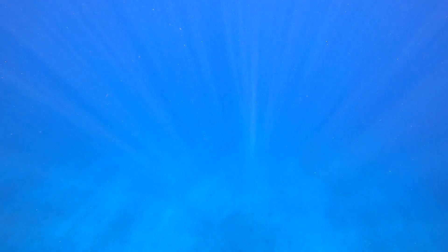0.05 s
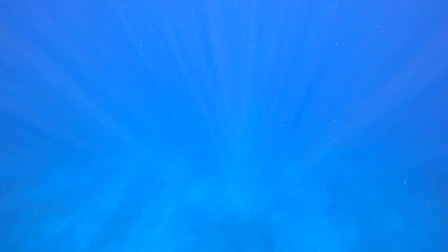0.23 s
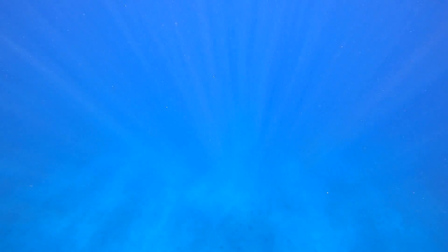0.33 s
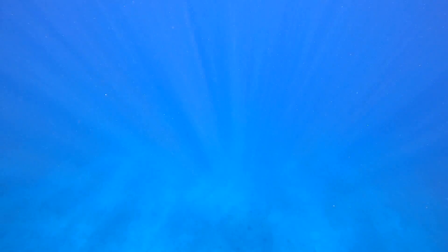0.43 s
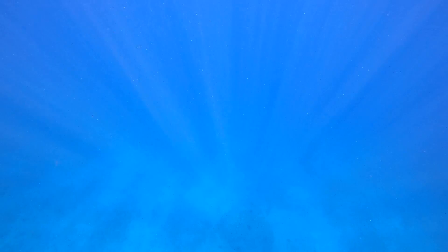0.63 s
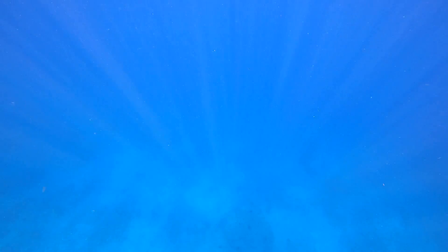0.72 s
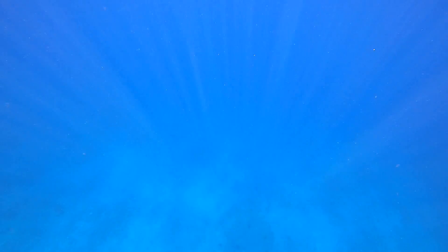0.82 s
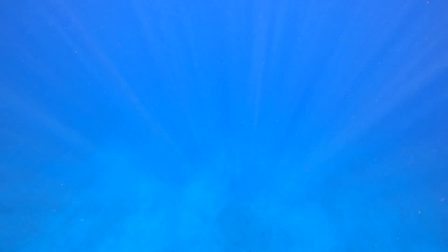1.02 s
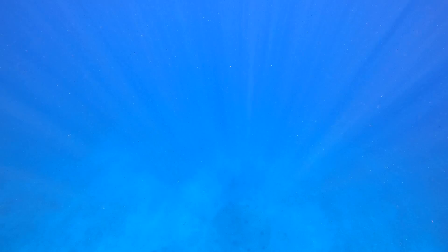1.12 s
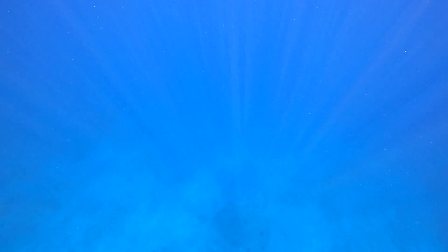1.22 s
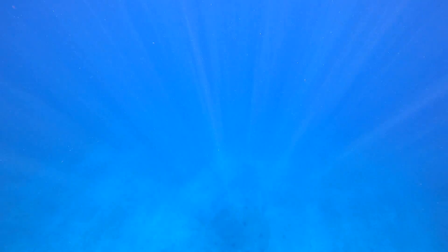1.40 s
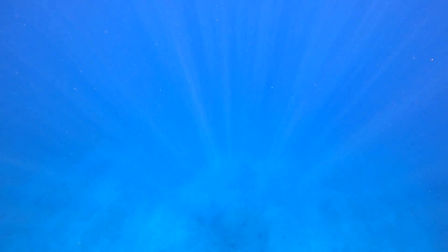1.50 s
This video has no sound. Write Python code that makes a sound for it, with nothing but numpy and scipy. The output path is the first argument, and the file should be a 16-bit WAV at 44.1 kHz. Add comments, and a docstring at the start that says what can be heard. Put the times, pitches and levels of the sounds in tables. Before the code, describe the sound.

One low underwater whale moan swells and sinks, with faint crackles and soft knocks.

```python
"""One whale moan rises and falls under water, over crackling shrimp, soft knocks and a low rumble.
The moan is an almost pure tone with faint overtones, smeared by echoes between surface and seabed;
it turns hoarse as it falls. Snapping shrimp make the crackle. Water knocks on the camera housing,
and the swell rumbles underneath."""
import sys
import numpy as np
from scipy import signal
from scipy.fft import rfft, irfft, next_fast_len
from scipy.io import wavfile
from scipy.ndimage import map_coordinates

SR = 44100
rng = np.random.default_rng(int(sys.argv[2]) if len(sys.argv) > 2 else 0)


def materialize(psi):
    """Save the field psi as 16-bit PCM at rate SR to the path in sys.argv[1].

    A 1-D psi becomes a single channel; in a 2-D psi each row is a channel.
    """
    bounded = np.clip(np.atleast_2d(psi).T, -1, 1)
    quanta = np.round(bounded * 32767).astype(np.int16)
    wavfile.write(sys.argv[1], SR, quanta)


N = 68355
T = np.arange(N) / SR

# Water noise spectra. Each row: frequency in Hz, relative level in dB.
RUMBLE_SPECTRUM = [(10, -8), (25, 2.5), (36, 9), (50, 0), (66, 3), (82, -11.5), (100, -16.5), (140, -31.5),
                   (250, -68), (800, -120)]
WASH_SPECTRUM = [(90, -7), (140, -8), (180, 3), (240, -1.5), (320, -1), (380, 4), (450, -4.5), (540, -23.5),
                 (700, -29.5), (900, -48), (2000, -100)]
HISS_SPECTRUM = [(600, -16.5), (900, -8), (1100, -0.5), (1600, 3.5), (2200, 1.5), (4400, 4.5), (5500, -6.5),
                 (6800, -3.5), (8000, -16.5), (10000, -20.5), (12000, -33.5), (15000, -45)]
SPLASH_SPECTRUM = [(80, -7), (230, 12), (500, 11), (700, -9), (900, -25), (1150, -12), (1800, -10.5),
                   (3000, -34.5), (6000, -29.5), (10000, -57.5)]
# Swell, wash and hiss envelopes. Each row: time in seconds, level in dB (relative for the swell).
RUMBLE_DB = [(0, -46.5), (.12, -33), (.28, -41), (.36, -30), (.5, -36.5), (.6, -41), (.72, -39.5),
             (.82, -33.5), (1, -39), (1.12, -37.5), (1.23, -39), (1.33, -38.5), (1.41, -36), (1.55, -36)]
WASH_DB = [(0, -49.5), (.25, -50), (.42, -40), (.55, -51), (.85, -46), (1, -47.5), (1.12, -60.5),
           (1.3, -68.5), (1.55, -57)]
HISS_DB = [(0, -69.5), (.27, -70), (.35, -68.5), (.44, -68), (.53, -69), (.6, -71.5), (.67, -68),
           (.9, -68.5), (1.13, -68.5), (1.26, -70.5), (1.35, -68), (1.44, -67), (1.55, -66)]
# Knocks on the housing. Each row: peak time in seconds, level in dB, pitch in Hz, rise in seconds,
# splash in dB, low push in dB relative to the knock.
KNOCKS = [(.124, -41, 397, 0.0022, -63.5, -15), (1.193, -21, 332, 0.0031, -55.5, -7),
          (1.228, -31, 330, 0.0027, -72, -8), (1.256, -39.5, 390, 0.0045, -54.5, -17),
          (1.298, -35.5, 401, 0.0062, -44.5, -17), (1.392, -35, 340, 0.0083, -59.5, -14),
          (1.459, -24.5, 389, 0.0032, -73, -28), (1.54, -32.5, 376, 0.0057, -31.5, -7)]

# Near shrimp snaps. Each row: start in seconds, crack in dB, crack T60 in seconds, scatter in dB,
# ring in dB, direct click in dB.
SNAPS = [(0.0178, -52, 0.013, -70, -57, -72), (.061, -46.5, 0.011, -80.5, -51.5, -70.5),
         (0.1192, -53, 0.045, -58.5, -45.5, -65), (.166, -50.5, .022, -59.5, -52, -62.5),
         (.2098, -45, 0.015, -67, -55, -48.5), (0.23, -53.5, 0.011, -78.5, -65, -74),
         (0.297, -44, .009, -68, -65, -49), (0.34, -51, .014, -67.5, -66, -70.5),
         (.3635, -45.5, .017, -63.5, -47, -58), (.495, -50, .009, -67, -61.5, -50),
         (0.5169, -52.5, 0.01, -72.5, -67.5, -61.5), (0.5356, -50, 0.018, -65, -64.5, -69),
         (0.5534, -51.5, .012, -73, -68, -69), (.603, -52.5, .008, -78, -67.5, -67),
         (.643, -52.5, .01, -70, -66.5, -46), (0.6496, -46, 0.01007, -71, -58, -62),
         (0.7688, -47.5, .02, -67, -66, -59), (.827, -47.5, 0.023, -61, -70, -63),
         (0.8397, -43.5, 0.034, -54.5, -56, -64), (.872, -51, 0.016, -69, -68, -58),
         (0.9142, -45.5, 0.034, -52, -64, -55), (1.0313, -41.5, 0.025, -55, -64.5, -55.5),
         (1.1025, -50, 0.013, -68, -64, -71), (1.23, -49.5, 0.0079, -79, -63, -60),
         (1.288, -49.5, 0.017, -55, -66, -53.5), (1.301, -44, .01, -72, -66, -59),
         (1.3135, -41, .011, -65, -58, -56), (1.336, -47, .011, -66, -60, -57),
         (1.353, -44, .011, -64, -51, -51.5), (1.3677, -47.5, 0.021, -65, -51, -56.5),
         (1.374, -51, 0.015, -66, -59, -48.5), (1.3806, -34, .012, -59, -64, -44.5),
         (1.397, -42, .012, -68, -61.5, -50), (1.479, -44, 0.017, -66, -53, -54.5),
         (1.487, -50.5, 0.016, -77, -62, -66)]
# Snap and direct click spectra. Each row: frequency in Hz, relative level in dB.
SNAP_SPECTRUM = [(500, -27.5), (900, -23.5), (1200, -10), (2100, -4), (3200, 0), (4300, 2.5), (5300, -3),
                 (6800, -10), (7800, -27), (10000, -32.5), (15000, -50)]
CLICK_SPECTRUM = [(300, -50), (1000, -24.5), (3000, -11), (4200, -1.5), (5200, -1), (6500, -6), (8000, -10),
                  (10500, -8.5), (12500, -20.5), (15000, -31.5)]

# Decay of the sea's echoes. Each row: frequency in Hz, T60 in seconds.
SEA_T60_S = [(100, 0.14), (360, 0.95), (720, 1.3), (1400, 0.69), (5000, 0.37)]
# Moan pitch. Each row: time in seconds, fundamental in Hz.
PITCH_HZ = [(0, 335.7), (.22, 332.7), (.3, 344.6), (.37, 357.4), (.45, 363.7), (.53, 371.9), (.62, 362.4),
            (.72, 356.3), (.82, 344.3), (.88, 333.2), (.93, 320.2), (1, 304.2), (1.08, 278.2)]
# Roughness of the fundamental. Each row: time in seconds, flutter depth from 0 to 1.
ROUGHNESS = [(0, .1), (.35, .06), (.5, 0), (.6, 0.08), (.72, .05), (.8, 0.3), (.92, 0.23), (1.05, 0.2)]
# Envelopes of fundamental, harmonics 6-12 and rasp. Each row: time in seconds, relative level in dB.
TONE_DB = [(0, -44), (.14, -38), (.24, -30), (.29, -21), (.37, -17), (.398, -23), (.435, -15), (.58, -15),
           (.64, -16.5), (.675, -20), (.71, -15), (.76, -29.5), (.783, -19.5), (.796, -25), (.82, -18.5),
           (.85, -22), (.873, -28.5), (.892, -17.5), (.95, -18.5), (1.02, -31), (1.08, -43), (1.16, -73.5)]
HIGH_HARMONICS_DB = [(0, -76), (.22, -72), (.33, -76.5), (.48, -79), (.55, -66.5), (.6, -79.5), (.8, -79),
                     (1, -91.5)]
RASP_DB = [(.55, -78.5), (.75, -67.5), (.95, -65.5), (1.06, -64.5), (1.15, -73), (1.3, -98)]
# Low overtone envelopes. Each row: time in seconds, relative levels of harmonics 2, 3, 4, 5 in dB.
LOW_HARMONICS_DB = [(0, -80, -72, -84, -74), (0.169, -71.5, -73.5, -72.5, -73),
                    (.24, -64.5, -75.5, -77, -58.5), (.3, -65, -69.5, -58, -68),
                    (.4, -53.5, -68.5, -65.5, -71), (.48, -73.5, -63, -61, -61.5),
                    (0.549, -73.5, -74, -69.5, -75.5), (0.631, -66, -71, -60.5, -56),
                    (0.689, -57.5, -72.5, -63, -67.5), (0.739, -52.5, -62.5, -51.5, -68.5),
                    (.81, -59.5, -60, -51, -62.5), (0.878, -61, -70, -67.5, -66.5),
                    (0.959, -78, -75.5, -77.5, -77.5), (1.079, -104, -103.5, -94.5, -94.5)]
# Colour of the overtones, their echo and the rasp. Each row: frequency in Hz, gain in dB.
THROAT_GAIN_DB = [(550, -5.5), (680, -0.5), (760, -3.5), (900, -16.5), (1030, -2.5), (1850, -2.5),
                  (2050, -6), (2350, -1.5), (2900, -6), (3330, -0.5), (3700, -7), (4100, -1.5),
                  (4500, -9.5)]
ECHO_GAIN_DB = [(700, -9), (1100, 0), (1500, 3), (2200, -4)]
RASP_SPECTRUM = [(400, -59.5), (700, -14.5), (900, -22.5), (1060, -2), (1200, -0.5), (1300, -10),
                 (1420, 1.5), (1620, 0), (1850, -10), (2300, -26.5), (5000, -77.5)]


def amp(db):
    """Decibels to gain."""
    return 10 ** (np.asarray(db) / 20)


def unit_rms(x):
    """Scale to rms 1."""
    return x / np.sqrt(np.mean(x ** 2) + 1e-20)


def at_hz(rows, hz):
    """Interpolate (Hz, value) rows on a log axis."""
    row_hz, values = np.transpose(rows)
    return np.interp(np.log(hz + 1), np.log(row_hz + 1), values)


def curve(rows):
    """Interpolate (s, value) rows at every sample."""
    return np.interp(T, *np.transpose(rows))


def wobble(knots_per_s):
    """Smooth random curve."""
    knots = rng.standard_normal(int(N * knots_per_s / SR) + 4)
    return map_coordinates(knots, [T * knots_per_s])


def filtered(x, response):
    """Apply the gain response(hz)."""
    size = next_fast_len(N + SR // 2)
    hz = np.fft.rfftfreq(size, 1 / SR)
    return irfft(rfft(x, size) * response(hz), size)[:N]


def noise(spectrum, tilt_db_per_oct=0):
    """Coloured noise of rms 1, tilted above 1 kHz."""
    def response(hz):
        return amp(at_hz(spectrum, hz) + tilt_db_per_oct * np.log2(np.maximum(hz, 1000)))
    return unit_rms(filtered(rng.standard_normal(N), response))


def band(centre_hz, width_hz):
    """Noise of rms 1 in one narrow resonance."""
    white = rng.standard_normal(N)
    return unit_rms(filtered(white, lambda hz: np.exp(-((hz - centre_hz) / width_hz) ** 2)))


def burst(start_s, t60_s, attack_s=0.001):
    """Fast rise, exponential decay."""
    age_s = np.maximum(T - start_s, 0)
    return (1 - np.exp(-(age_s / attack_s) ** 2)) * amp(-60 * age_s / t60_s)


def water():
    """The surging rumble of the swell, a low wash and a thin hiss."""
    rumble = amp(curve(RUMBLE_DB) + 2) * noise(RUMBLE_SPECTRUM)
    wash = amp(curve(WASH_DB)) * noise(WASH_SPECTRUM)
    hiss = amp(curve(HISS_DB)) * noise(HISS_SPECTRUM)
    return rumble + wash + hiss


def knocks(fall_ratio=1.6):
    """Water hits the housing: a few soft cycles, a low push and a faint splash."""
    out = np.zeros(N)
    for peak_s, level_db, pitch_hz, rise_s, splash_db, push_db in KNOCKS:
        width_s = rise_s * np.where(T < peak_s, 1, fall_ratio)
        pulse = amp(level_db) * np.exp(-((T - peak_s) / width_s) ** 2)
        out += pulse * (np.sin(2 * np.pi * pitch_hz * (T - peak_s)) - amp(push_db))
        splash = burst(peak_s - rise_s, t60_s=0.17, attack_s=0.0012) * noise(SPLASH_SPECTRUM)
        out += amp(splash_db) * splash
    return out


def far_shrimp(snaps_per_s=130, spread_db=1.5, t60_s=0.0097, level_db=-70):
    """Distant snaps merge into a soft fizz."""
    onsets = rng.random(N) < snaps_per_s / SR
    hits = onsets * amp(spread_db * np.minimum(rng.exponential(size=N), 3))
    energy = signal.fftconvolve(hits ** 2, burst(0, t60_s) ** 2)[:N]
    return amp(level_db) * unit_rms(np.sqrt(np.abs(energy)) * noise(SNAP_SPECTRUM))


def near_shrimp():
    """Each snap: a short crack, fading scatter, a ring of the housing and a direct click."""
    out = np.zeros(N)
    for start_s, crack_db, t60_s, scatter_db, ring_db, click_db in SNAPS:
        tilt_db_per_oct = -7.5 * np.log2(t60_s / 0.018)  # longer cracks are duller
        crack = burst(start_s, t60_s) * noise(SNAP_SPECTRUM, tilt_db_per_oct)
        scatter = burst(start_s, t60_s=0.14) * noise(SNAP_SPECTRUM, tilt_db_per_oct=-4)
        ring = burst(start_s, t60_s=0.028) * band(centre_hz=4250, width_hz=580)
        click = burst(start_s, t60_s=0.0036, attack_s=0.00026) * noise(CLICK_SPECTRUM)
        out += amp(crack_db) * crack + amp(scatter_db) * scatter
        out += amp(ring_db) * ring + amp(click_db) * click
    return out


def hanging_echo(full_db=-42, build_s=1.7):
    """The song's far reverberation: a narrow, wavering noise band that grows steadily."""
    return amp(full_db) * band(centre_hz=362.4, width_hz=6.8) * np.minimum(T / build_s, 1)


def sea_echoes(x, delay_s=0.032, build_s=0.03):
    """Surface and seabed echoes build up, then decay at a rate set by frequency; same rms as x."""
    hz, age_s, spectra = signal.stft(rng.standard_normal(N), SR, nperseg=256)
    build = 1 - np.exp(-np.maximum(age_s - delay_s, 0) / build_s)
    decay = amp(-60 * age_s / at_hz(SEA_T60_S, hz)[:, None])
    _, tail = signal.istft(spectra * build * decay, SR, nperseg=256)
    return unit_rms(signal.fftconvolve(x, tail)[:N]) * np.std(x)


def late_echo(x, delay_s=0.42, gain_db=-24.5):
    """One distant reflection, which beats against the falling tone."""
    return amp(gain_db) * np.interp(T - delay_s, T, x, left=0)


def whale_rasp(flicker_db=2.7):
    """The hoarse, diffuse end of the moan."""
    return amp(curve(RASP_DB) + flicker_db * wobble(30)) * noise(RASP_SPECTRUM)


def whale_overtones(pitch_hz, phase, flicker_depth=0.35):
    """Harmonics 2-12, coloured by the throat; each flickers on its own."""
    times_s, *low_db = np.transpose(LOW_HARMONICS_DB)
    out = np.zeros(N)
    for k in range(2, 13):
        level_db = np.interp(T, times_s, low_db[k - 2]) if k <= 5 else curve(HIGH_HARMONICS_DB)
        throat_db = at_hz(THROAT_GAIN_DB, k * pitch_hz)
        flicker = 1 + flicker_depth * wobble(60)
        out += amp(level_db + throat_db) * flicker * np.sin(k * phase)
    return out


def whale_moan(jitter=0.0025, tone_wet_db=-15, overtone_wet_db=-5):
    """A strong fundamental that roughens as it falls, weak overtones, and their echoes."""
    pitch_hz = curve(PITCH_HZ) * (1 + jitter * wobble(40))
    phase = 2 * np.pi * np.cumsum(pitch_hz) / SR
    flutter = wobble(90) * np.sin(phase) + wobble(90) * np.cos(phase)
    tone = np.sqrt(2) * amp(curve(TONE_DB)) * (np.sin(phase) + curve(ROUGHNESS) * flutter)
    overtones = whale_overtones(pitch_hz, phase)
    overtone_echo = filtered(sea_echoes(overtones), lambda hz: amp(at_hz(ECHO_GAIN_DB, hz)))
    echoes = amp(tone_wet_db) * sea_echoes(tone) + amp(overtone_wet_db) * overtone_echo
    return tone + overtones + echoes + late_echo(tone)


def scene():
    """All sources at one microphone."""
    whale = whale_moan() + whale_rasp() + hanging_echo()
    return (whale + near_shrimp() + far_shrimp() + knocks() + water())[None]


def record(dry):
    """The camera passes nothing above 15 kHz."""
    return filtered(dry[0], lambda hz: hz < 15000)[None]


dry = scene()
out = record(dry)
materialize(out)
```